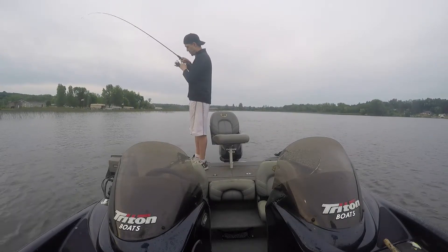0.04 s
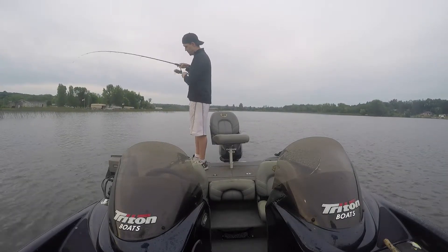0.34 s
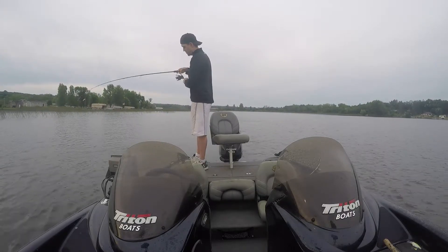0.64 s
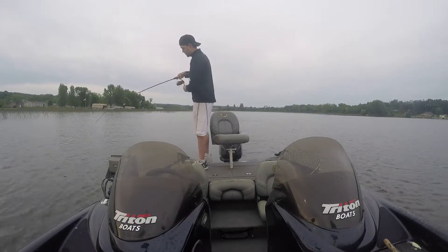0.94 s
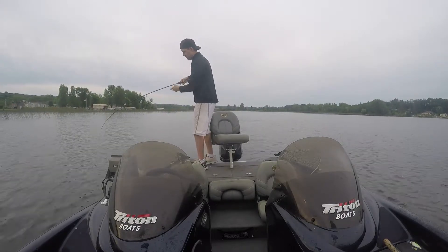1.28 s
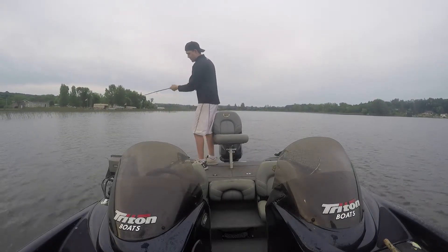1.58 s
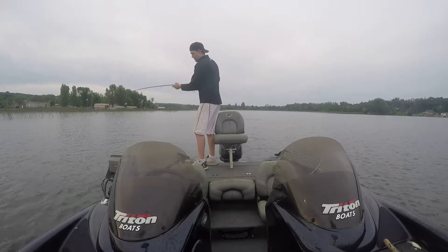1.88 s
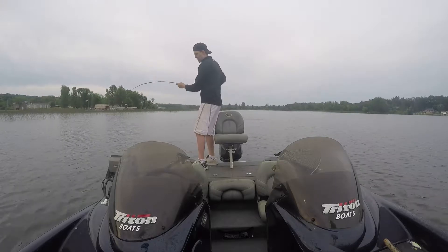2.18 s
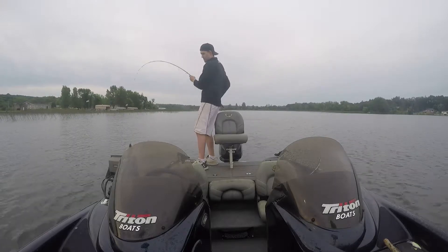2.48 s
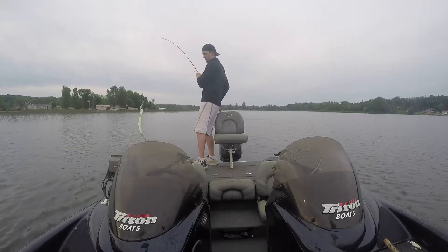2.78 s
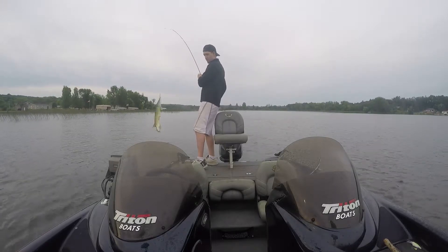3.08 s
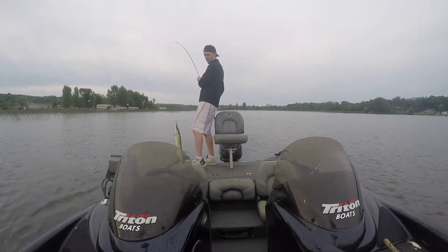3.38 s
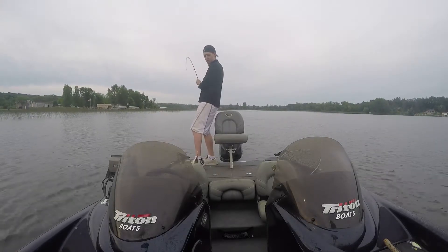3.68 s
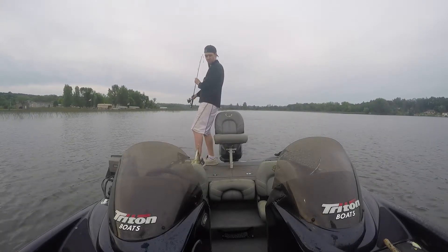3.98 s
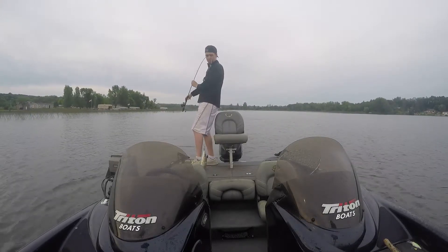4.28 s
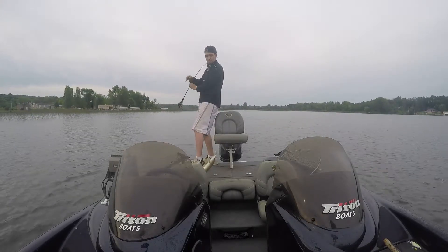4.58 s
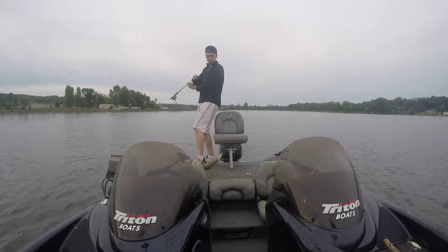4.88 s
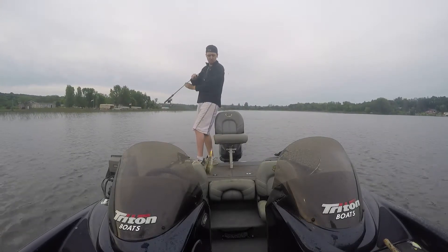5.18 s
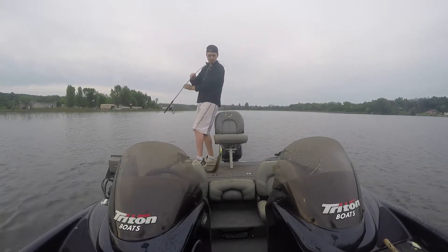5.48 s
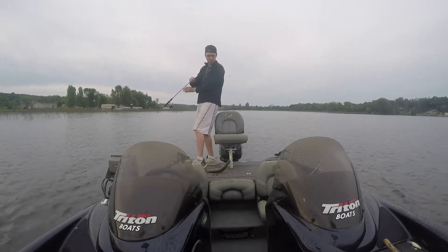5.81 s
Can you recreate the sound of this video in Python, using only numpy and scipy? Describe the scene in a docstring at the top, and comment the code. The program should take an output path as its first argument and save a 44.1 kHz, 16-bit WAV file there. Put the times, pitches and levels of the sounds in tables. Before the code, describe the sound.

Water laps and a fish thrashes briefly, followed by dull deck thumps, tackle clacks and rustling cloth, with low wind throughout.

```python
"""A fish thrashes at the surface of a lake as an angler lands it on a small boat.
Each stroke slaps the water, throws spray and traps air, which rings as bubbles; wavelets lap and gulp
at the hull. Blows excite the modes of the hollow deck, tackle clacks, soles scuff, and a jacket rustles
close by through stick-slip friction. Wind eddies rumble on the microphone over a soft open-air hiss,
and birds call faintly from the shore."""
import sys
import numpy as np
from scipy import signal
from scipy.fft import rfft, irfft, next_fast_len
from scipy.io import wavfile
from scipy.ndimage import uniform_filter1d, map_coordinates

SR = 44100
rng = np.random.default_rng(int(sys.argv[2]) if len(sys.argv) > 2 else 0)


def inscribe(sig):
    """Save sig as 16-bit PCM at rate SR to the path in sys.argv[1].

    A 1-D sig is mono; a 2-D sig holds one channel per row.
    Samples are clipped to [-1, 1] before scaling.
    """
    pcm = np.round(np.clip(np.atleast_2d(sig).T, -1, 1) * 32767)
    wavfile.write(sys.argv[1], SR, pcm.astype(np.int16))


N = 266805
SPLASH_RISE_S = 0.0012


def amp(db):
    """Decibels to amplitude gain."""
    return 10 ** (np.asarray(db) / 20)


def unit(x):
    """Scale to rms 1."""
    return x / np.sqrt(np.mean(x ** 2) + 1e-20)


def clock(seconds):
    """Sample times from zero."""
    return np.arange(int(seconds * SR)) / SR


def curve(rows):
    """Level per sample through (time [s], level [dB]) points, silent outside their span."""
    s, db = np.transpose(rows)
    return np.interp(np.arange(N) / SR, s, db, left=-120, right=-120)


def swell(s, hold, rise, t60):
    """Envelope that rises from time s, holds until s + hold and decays exponentially."""
    t = np.arange(N) / SR - s
    return np.clip(t / rise, 0, 1) * amp(-60 * np.maximum(t - hold, 0) / t60)


def wobble(rate):
    """Smooth random modulation with rate knots a second."""
    knots = rng.standard_normal(int(N * rate / SR) + 4)
    return map_coordinates(knots, [np.arange(N) * rate / SR])


def filtered(x, response):
    """Linear filter: the spectrum of x times a frequency response."""
    size = next_fast_len(len(x) + 8192)
    return irfft(rfft(x, size) * response(np.fft.rfftfreq(size, 1 / SR)), size)[:len(x)]


def coloured(x, response):
    """Linear filter scaled to conserve the power of white noise."""
    power = np.mean(np.abs(response(np.fft.rfftfreq(4096, 1 / SR))) ** 2)
    return filtered(x, response) / np.sqrt(power)


def spectrum(points):
    """Response through (frequency [Hz], level [dB]) points on a logarithmic frequency axis."""
    hz, db = np.transpose(points)
    return lambda f: amp(np.interp(np.log(f + 1), np.log(hz + 1), db))


def band(hz, width):
    """Response of two identical damped resonators in cascade, each width Hz wide."""
    return lambda f: (1j * f * width / (hz * hz - f * f + 1j * f * width)) ** 2


def dull(x, cutoff_hz=3900, order=7):
    """Low-pass filter that takes the top off an impact."""
    return filtered(x, lambda f: 1 / np.sqrt(1 + (f / cutoff_hz) ** (2 * order)))


def patchy(x, depth_db):
    """Random modulation in time and frequency, in patches of about 1 kHz by 15 ms."""
    bins = signal.stft(x, nperseg=256)[2]
    field = uniform_filter1d(rng.standard_normal(bins.shape), size=6, axis=0)
    field = uniform_filter1d(field, size=5, axis=1)
    return signal.istft(bins * unit(amp(depth_db * unit(field))), nperseg=256)[1][:N]


def add(track, s, sound):
    """Superpose a sound on the track at time s."""
    start = max(round(s * SR), 0)
    track[start:start + len(sound)] += sound[:max(N - start, 0)]


def ticks(rate, spread_db):
    """Shot noise: random impulses of uneven size, rate a second, rms 1."""
    impulses = (rng.random(N) < rate / SR) * rng.choice([-1, 1], N)
    return unit(impulses * amp(spread_db * rng.random(N)))


def puff(t, rise, t60):
    """Noise transient with a smooth onset and an exponential decay."""
    envelope = (1 - np.exp(-t / rise)) ** 2 * amp(-60 * t / t60)
    return 0.26 * rng.standard_normal(len(t)) * envelope / envelope.max()


def burst(hz, width, t60):
    """Impact: an impulse and decaying noise excite one broad resonance."""
    t = clock(.2)
    noise = rng.standard_normal(len(t)) * amp(-60 * t / t60) * (1 - np.exp(-t / 0.0015))
    push = filtered(signal.unit_impulse(len(t), round(.0012 * SR)), band(hz, width))
    return 0.53 * coloured(noise, band(hz, width)) + 0.5 * push / np.abs(push).max()


def boom(hz, cycles):
    """Heavily damped pressure pulse whose envelope peaks after the given cycles."""
    t = clock(.3)
    age = t * hz / cycles
    return (age * np.exp(1 - age)) ** 2 * np.sin(2 * np.pi * hz * t)


def damped_tone(t, hz, cycles, rise):
    """Damped oscillation whose pitch rises, as a bubble's does when it nears the surface."""
    age = t * hz / cycles
    phase = 2 * np.pi * cycles * (age + rise * (age - 1 + np.exp(-age)))
    return np.sin(phase) * np.exp(-age) * (1 - np.exp(-t * hz))


def cloud(count, low_hz, high_hz, cycles, spread_db):
    """Incoherent sum of bubbles of random onset, pitch and strength, rms 1."""
    t = clock(0.054)
    when, pitch, size = rng.random((count, 3)).T
    hz = low_hz * (high_hz / low_hz) ** pitch
    rings = (amp(spread_db * size ** 3) * hz)[:, None] * damped_tone(t, hz[:, None], cycles, rise=0.161)
    index = (when * N).astype(int)[:, None] + np.arange(len(t))
    return unit(np.bincount(index.ravel(), rings.ravel(), N)[:N])


def wind():
    """Turbulence: passing eddies press on the microphone in quick, low lumps."""
    # spectrum of the turbulence (frequency [Hz], level [dB])
    rumble = [(10, -17.5), (18, -6.5), (32, 0.5), (50, -5), (80, -14), (100, -20), (125, -15.5), (180, -27),
              (260, -30.5), (340, -40), (480, -62.5), (900, -70)]
    # strength of the wind (time [s], level [dB])
    strength = [(0, -38.5), (1.3, -38.5), (2.1, -37), (3.1, -39), (3.55, -34), (4.5, -36), (5.1, -33),
                (6.05, -38.5)]
    # single eddies striking (time [s], level [dB])
    buffets = [(0.302, -26), (0.574, -24.5), (0.718, -29), (1.875, -26.5), (2.142, -27), (3.325, -18),
               (4.241, -19), (4.894, -18.5), (5.594, -22.5), (5.654, -22)]
    eddies = coloured(rng.standard_normal(N), spectrum(rumble))
    level_db = np.interp(np.arange(N) / SR, *np.transpose(strength))
    out = unit(eddies * amp(0.65 * wobble(18))) * amp(level_db)
    for s, db in buffets:
        add(out, s, amp(db) * boom(hz=37.2, cycles=0.58))
    return out


def air():
    """Ambient noise: a nearly steady broadband hiss with a faint narrowband whine."""
    # spectrum of the open air (frequency [Hz], level [dB])
    ambience = [(100, 1.5), (400, 3), (800, -2), (1500, -9.5), (2300, -8.5), (3100, -7), (4200, -11.5),
                (6000, -14.5), (8000, -19.5), (11000, -21.5), (15500, -31)]
    hiss = unit(coloured(rng.standard_normal(N), spectrum(ambience))) * amp(.4 * wobble(5))
    whine = unit(filtered(rng.standard_normal(N), band(hz=8550, width=120)))
    return amp(-61) * hiss + amp(-88) * whine


def churn():
    """Bubble pitch falls with size: in stirred water big ones gurgle, small ones fizz, and drops patter."""
    # spectrum of stirred water (frequency [Hz], level [dB])
    water_colour = [(120, -40), (250, 8), (400, -13), (650, 5), (1100, 0), (1700, -5.5), (2200, -3),
                    (2550, -5.5), (3100, 0), (3700, -6.5), (4300, -12.5), (5700, -15), (6600, -36),
                    (11500, -26), (15500, -33)]
    # water heaved up by the fish (time [s], level [dB], t60 [s])
    heaves = [(.992, -43.5, 0.19), (1.042, -52, 0.28), (1.16, -43, 0.38), (1.325, -35, 0.12),
              (1.45, -41.5, 0.25)]
    # stirring around the boat (time [s], level [dB])
    stirring = [(0, -70.5), (.33, -65.5), (.7, -80), (.95, -62), (1.35, -56), (1.95, -64), (2.7, -86)]
    water = spectrum(water_colour)
    fizz = cloud(count=2800, low_hz=783, high_hz=4190, cycles=8.2, spread_db=12)
    fizz = unit(filtered(fizz, water))
    drops = coloured(ticks(rate=700, spread_db=16), water)
    foam = coloured(rng.standard_normal(N), water)
    patter = patchy(.52 * fizz + .5 * drops + .76 * foam, depth_db=1.5) * amp(1.2 * wobble(30))
    droplets = coloured(ticks(rate=1400, spread_db=18), band(hz=6000, width=7000))
    droplets = patchy(droplets, depth_db=3)
    drips = cloud(count=450, low_hz=850, high_hz=3400, cycles=4, spread_db=6)
    drips = unit(filtered(drips, lambda f: 1 / (1 + f / 700)))
    plops = cloud(count=900, low_hz=700, high_hz=2100, cycles=3.5, spread_db=8)
    plops = unit(filtered(plops, lambda f: 1 / (1 + f / 500)))
    gurgle = cloud(count=1100, low_hz=182, high_hz=857, cycles=2.7, spread_db=10)
    gurgle = unit(filtered(gurgle, lambda f: water(f) ** 0.37 / (1 + f / 300)))
    patch = amp(-49.5) * swell(1.241, hold=0.48, rise=0.24, t60=0.5)  # churned water foams and settles
    heave = sum(amp(db) * swell(s, hold=0.014, rise=0.014, t60=t60) for s, db, t60 in heaves)
    ripple = amp(curve(stirring))
    return (patter * np.hypot(patch, ripple) + (amp(-19.5) * droplets + amp(-5) * plops) * patch
            + amp(-2.5) * (drips * ripple + gurgle * heave))


def laps():
    """Liquid impact: a wavelet slaps the hull, then washes off more softly."""
    # wavelets (time [s], level [dB], centre frequency [Hz])
    wavelets = [(.172, -35.5, 1600), (0.236, -42, 1280), (.274, -52, 1700), (0.618, -39, 1380),
                (0.624, -26, 1490), (1.963, -45, 1470), (1.99, -37.5, 2550)]
    out = np.zeros(N)
    for s, db, hz in wavelets:
        slap = burst(hz, width=0.75 * hz, t60=0.016)
        wash = amp(-17) * burst(hz, width=hz, t60=0.082)
        add(out, s, amp(db - 1) * (slap + wash))
    return dull(out)


def hull_scatter(x):
    """Scattering: the boat's sides and the water add a short, weak tail to the direct sound."""
    t = clock(.08)
    tail = rng.standard_normal(len(t)) * amp(-60 * t / 0.059) * (t > .003)
    return x + amp(-10) * signal.fftconvolve(x, tail / np.linalg.norm(tail))[:N]


def bubbles():
    """Bubble resonance: a small splash traps air, which rings as a spring against the water's mass."""
    # single bubbles (time [s], level [dB], frequency [Hz])
    trapped_air = [(0.273, -36, 1740), (.304, -44, 1140), (0.447, -40.5, 1100), (0.872, -35.5, 970),
                   (.959, -39, 940), (.996, -33.5, 584), (0.994, -43, 268), (1.008, -38, 770),
                   (1.05, -39, 610), (1.072, -39, 537), (1.185, -38, 258), (1.198, -35, 1040),
                   (1.199, -36, 580), (1.307, -26, 1174), (1.3245, -32, 695), (1.344, -18.5, 782),
                   (1.446, -32, 1000), (1.495, -41, 910), (1.521, -26.5, 1025), (1.562, -32, 1250),
                   (1.647, -31, 980), (1.845, -40.5, 970), (2.04, -49, 1130), (2.13, -43, 866),
                   (2.142, -43, 1270), (2.16, -44, 820), (2.305, -35, 972), (2.435, -39.5, 1010),
                   (2.47, -44.5, 1600), (3.066, -39.5, 1070), (3.064, -45, 1620)]
    rings, splashes, t = np.zeros(N), np.zeros(N), clock(.1)
    for s, db, hz in trapped_air:
        add(rings, s, amp(db - 3.5) * damped_tone(t, hz, cycles=4.3, rise=0.01))
        splash = coloured(puff(t, SPLASH_RISE_S, t60=0.046), band(1.22 * hz, 0.67 * hz))
        add(splashes, s, amp(db - 12.5) * splash)
    return rings + dull(splashes)


def gulps():
    """Air-pocket resonance: air shut against the hull gurgles and sinks in pitch as water sloshes out."""
    # air pockets (time [s], level [dB], final frequency [Hz], initial excess of frequency [fraction])
    pockets = [(.628, -41.5, 494, 0.17), (3.943, -36.5, 473, 0.44), (4.533, -47.5, 578, 0.4),
               (5.346, -35.5, 506, 0.053)]
    out, t = np.zeros(N), clock(.15)
    envelope = (t / 0.012 * np.exp(1 - t / 0.0095)) ** 1.2
    for s, db, hz, excess in pockets:
        phase = 2 * np.pi * np.cumsum(hz * (1 + excess * np.exp(-t / 0.01))) / SR
        tremble = 1.14 * wobble(401)[:len(t)]  # the pocket's shape trembles
        flutter = amp(1.8 * wobble(310)[:len(t)])
        add(out, s, amp(db - 1) * envelope * flutter * np.sin(phase + tremble))
        slosh = coloured(puff(t, rise=0.0033, t60=0.074), band(1.4 * hz, 0.73 * hz))
        add(out, s, amp(db - 5) * slosh)
    return out


def thrashes():
    """Impact on a free surface: the fish smacks, slaps and throws spray; harder strokes last longer."""
    # strokes of the fish (time [s], level [dB], centre frequency [Hz], spray level [dB])
    strokes = [(0.994, -33, 650, -60), (1.021, -31, 2300, -43), (1.14, -37, 3000, -37.5),
               (1.164, -38, 1690, -60), (1.296, -20.5, 2310, -29.5), (1.304, -26.5, 2900, -39),
               (1.3235, -22, 3100, -28), (1.4434, -26.5, 1100, -58), (1.457, -21.5, 2300, -45),
               (1.463, -27.5, 700, -38)]
    # spectrum of fine spray (frequency [Hz], level [dB])
    spray_colour = [(800, -14), (2500, -6), (4500, -0.5), (5700, -1), (6800, -13), (10000, -12),
                    (15500, -15)]
    hard_db, hard_t60_s = -23.5, 0.045  # a hard stroke and its decay
    slaps, sprays, t = np.zeros(N), np.zeros(N), clock(.1)
    for s, db, hz, spray_db in strokes:
        slap = puff(t, SPLASH_RISE_S, t60=hard_t60_s * np.exp(.08 * (db - hard_db)))
        add(slaps, s, amp(db - 4) * coloured(slap, band(hz, 1.8 * hz)))
        add(slaps, s, amp(db - 3) * burst(hz, width=1.8 * hz, t60=0.0053))  # smack of first contact
        spray = coloured(puff(t, rise=0.0027, t60=0.025), spectrum(spray_colour))
        add(sprays, s, amp(spray_db - 7.5) * spray)
    return dull(slaps) + sprays


def plips():
    """Drop impact: each drop excites one short, bright, damped ring that bends upwards."""
    # drops on the surface (time [s], level [dB], starting frequency [Hz])
    drops = [(1.0015, -38, 900), (1.0216, -35, 1120), (1.022, -44, 2700), (1.046, -43, 2100),
             (1.088, -46, 3080), (1.111, -44, 1310), (1.136, -45, 1780), (1.157, -43, 1130),
             (1.1648, -40, 2380), (1.1655, -34, 757), (1.222, -48, 2870), (1.5123, -46, 1340),
             (1.5492, -40, 1210), (1.598, -43, 2330), (1.6507, -44, 2090), (1.7555, -44, 2380),
             (2.0363, -43, 2750)]
    rise_s, t60_s, glide = 0.00034, 0.0088, 0.049
    out, t = np.zeros(N), clock(.04)
    envelope = (1 - np.exp(-t / rise_s)) ** 2 * amp(-60 * t / t60_s)
    for s, db, hz in drops:
        phase = 2 * np.pi * np.cumsum(hz * (1 + glide * np.tanh(2 * t / t60_s))) / SR
        add(out, s, amp(db) * envelope / envelope.max() * np.sin(phase))
    return out


def rough_smack():
    """Superposed damped tones: a rough, buzzing smack of several pitches, cut off after about 30 ms."""
    # pitches of the smack (frequency [Hz], level [dB], decay time [cycles])
    pitches = [(520, -37, 11), (820, -37.5, 12), (1056, -33.5, 24), (1420, -39, 33), (3130, -41.5, 75),
               (3500, -50, 64), (3746, -45, 92)]
    start_s, length_s = 1.328, 0.033
    out, t = np.zeros(N), clock(.1)
    gate = 1 / (1 + (t / length_s) ** 16)
    for hz, db, cycles in pitches:
        add(out, start_s, amp(db) * damped_tone(t, hz, cycles, rise=0.0032) * gate)
    return out


def jacket():
    """Stick-slip friction of threads: a light touch ticks thinly, firm rubbing rasps, a fold snaps."""
    # strokes of the sleeve (time [s], duration [s], level [dB], relative sheen level [dB])
    rubs = [(2.13, .11, -58.5, -20), (3.04, 0.025, -59, -1), (3.14, 0.19, -64.5, -15),
            (3.46, 0.14, -58.5, -14), (3.614, 0.13, -54, -6), (3.747, 0.048, -70, -3),
            (3.873, 0.01, -55.5, -10), (3.933, 0.0083, -58.5, -19), (4.71, 0.035, -55.5, -19),
            (4.77, 0.1, -49.5, -11), (4.881, 0.071, -50, -18), (4.953, 0.095, -55, -16),
            (5.025, 0.085, -48.5, -10), (5.123, 0.2, -54.5, -20), (5.332, 0.26, -61.5, -24)]
    # folds slipping (time [s], level [dB], t60 [s], tilt [dB/octave])
    folds = [(2.139, -41, 0.12, -3), (2.165, -46, .09, 0), (2.203, -38, .04, 0), (3.188, -40, 0.022, 1),
             (3.549, -37, 0.035, 8), (3.580, -35.5, 0.019, 4), (3.594, -40, 0.035, -1),
             (3.617, -33.5, 0.044, -2.5), (3.638, -27.5, 0.022, 1), (3.644, -35.5, 0.067, -3),
             (3.6757, -20, 0.016, 6), (3.679, -34.5, 0.072, 5), (3.727, -36, .03, 9),
             (4.768, -25.5, 0.031, 3), (4.798, -25, 0.049, 9), (4.823, -23, 0.055, 0.5),
             (4.8956, -25, 0.025, -3.5), (4.901, -27, 0.026, 2), (4.915, -28, 0.049, 10),
             (4.929, -22, 0.035, -2.5), (4.995, -32, 0.055, 6), (5.032, -24.5, 0.061, 3.5),
             (5.069, -24, 0.033, 5), (5.080, -27, 0.031, 7), (5.091, -25.5, 0.044, 12),
             (5.182, -34, 0.046, 3), (5.206, -33.5, 0.063, 8), (5.239, -35.5, 0.089, 4),
             (5.275, -34, .02, 6), (5.298, -32, 0.04, 1)]
    # single threads letting go (time [s], level [dB])
    releases = [(3.006, -44), (3.052, -43), (3.061, -43), (3.150, -50), (3.280, -46), (3.315, -47),
                (3.508, -49), (3.810, -46), (3.880, -57), (5.334, -49), (5.362, -46), (5.43, -50),
                (5.497, -44), (5.737, -45.5)]
    # spectrum of the cloth (frequency [Hz], level [dB])
    cloth_colour = [(300, 0.5), (1000, -7), (2200, -6), (3300, 3.5), (3800, -3.5), (4300, -15),
                    (5400, -9.5), (6600, -6), (7400, 9), (8200, -9.5), (9600, 0.5), (11000, -11.5),
                    (13000, -3), (15500, -14)]
    cloth = spectrum(cloth_colour)
    snaps, singles, t = np.zeros(N), np.zeros(N), clock(.1)
    jerks = unit(amp(2.8 * np.tanh(wobble(70)) + 3 * np.tanh(wobble(260))))
    strokes = np.array([amp(db) * swell(s, hold, rise=0.006, t60=0.22) for s, hold, db, _ in rubs])
    rub = strokes.sum(0) * jerks
    for s, db, t60, tilt_db in folds:
        tilted = lambda f: cloth(f) * amp(tilt_db * np.log2(1 + f / 1000))
        add(snaps, s, amp(db - 3) * coloured(puff(t, rise=0.014 * t60, t60=t60), tilted))
    for s, db in releases:
        add(singles, s, amp(db - 2) * puff(t, rise=0.0004, t60=0.018))
    pressure = 1 / (1 + (amp(-55) / rub) ** 2)  # 0 for a light touch, 1 for a firm one
    catches = rub * (1 - .6 * pressure) * (ticks(rate=240, spread_db=16) + .25 * rng.standard_normal(N))
    rasp = rub * pressure * (.8 * ticks(rate=1900, spread_db=24) + .58 * rng.standard_normal(N))
    thread_peaks = lambda f: band(7390, 490)(f) + .27 * band(12200, 1500)(f) + .13 * band(15000, 900)(f)
    thin = coloured(0.3 * catches + singles, thread_peaks)
    sheen_gain = amp(np.array(rubs)[:, 3]) @ strokes
    sheen = coloured(sheen_gain * ticks(rate=440, spread_db=14), band(hz=14700, width=1500))
    return patchy(thin + sheen + snaps + coloured(rasp, cloth), depth_db=3)


def zing():
    """Stick-slip excitation: quick, light slips run together in one narrow, high resonance."""
    # slipping while the fish is lifted (time [s], level [dB])
    slipping = [(2.9, -80), (2.92, -68), (3.0, -70.5), (3.06, -65), (3.12, -74), (3.15, -82)]
    slips_per_s = 70
    slip_count = np.cumsum(slips_per_s * (1 + .25 * wobble(40))) / SR
    pulses = .1 + np.exp(-6 * (slip_count % 1))
    slips = unit(rng.standard_normal(N) * pulses * amp(4 * wobble(60)))
    return amp(curve(slipping)) * coloured(slips, band(hz=7500, width=520))


def deck_thumps():
    """Modal vibration: soft, heavy blows flex the deck, ring its panels and set the air below booming."""
    # blows (time [s], level [dB], boom [Hz], ring level [dB], knock level [dB], knock [Hz])
    blows = [(3.464, -26, 103, -55, -44, 327), (3.593, -15.5, 63, -38, -26.5, 298),
             (3.625, -18, 87.5, -43.5, -49, 250), (4.76, -16.5, 78, -42, -41, 260),
             (5.062, -22, 85.5, -60, -47, 300), (5.068, -21.5, 165, -31.5, -19, 370),
             (5.084, -28, 168, -38.5, -26, 400), (5.1205, -9.5, 70.4, -32, -28, 310),
             (5.142, -9.5, 70, -43, -37, 340), (5.292, -20.5, 54.5, -43, -40, 387),
             (5.531, -25, 106, -49, -47, 390)]
    # panel modes (frequency [Hz], level [dB], t60 [s])
    modes = [(119, -6.5, 0.36), (139, 1, 0.3), (168.3, 5.5, 0.2), (203, 6, 0.074), (232, 7.5, 0.065),
             (287, 2, 0.091), (320, -1, 0.11), (400, -4.5, 0.12), (454, -11, 0.15), (532, -7, 0.099)]
    hollow_hz, hollow_t60_s, knock_cycles = 75.6, 0.6, 2.8
    out, t = np.zeros(N), clock(0.42)
    hollow = np.sin(2 * np.pi * hollow_hz * t) * amp(-60 * t / hollow_t60_s)
    hollow *= 1 - np.exp(-t * hollow_hz)
    for s, db, boom_hz, ring_db, knock_db, knock_hz in blows:
        add(out, s, amp(db - 1.5) * boom(boom_hz, cycles=0.67))
        add(out, s, amp(db - 16) * hollow)
        ring = np.zeros(len(t))
        for hz, mode_db, t60 in modes:
            decay = amp(mode_db + rng.normal(0, 1.5) - 60 * t / t60)
            ring += decay * np.sin(2 * np.pi * (hz * t + rng.random()))
        add(out, s, amp(ring_db - 1) * ring * (1 - np.exp(-t / 0.0045)))
        knock = np.sin(2 * np.pi * knock_hz * t) * np.exp(-t * knock_hz / knock_cycles)
        add(out, s, amp(knock_db - 9.5) * knock)
        add(out, s, amp(knock_db - 10.5) * burst(hz=370, width=300, t60=0.07))
    return out


def deck_clacks():
    """Hard impact: a brief contact with the deck excites a broad band and leaves a faint tail."""
    # contacts (time [s], level [dB], centre frequency [Hz])
    contacts = [(3.597, -41, 700), (4.745, -34, 800), (4.893, -33, 2380), (4.93, -39, 1300),
                (5.0689, -17.5, 900), (5.0701, -28, 3000), (5.119, -34, 1200), (5.301, -30, 700),
                (5.303, -30, 2470)]
    out = np.zeros(N)
    for s, db, hz in contacts:
        add(out, s, amp(db - 3) * burst(hz, width=1300, t60=0.022))
        add(out, s, amp(db - 24) * burst(hz, width=2900, t60=0.056))
    return dull(out, cutoff_hz=3950, order=8)


def birds():
    """Frequency-modulated tones: falling notes and level whistles waver on their way from the shore."""
    # slurred notes (time [s], duration [s], starting frequency [Hz], level [dB])
    slurs = [(4.175, .03, 4850, -71), (4.225, .035, 4700, -67), (4.252, .026, 4850, -66),
             (5.595, .045, 4900, -71), (5.697, .038, 3880, -60)]
    # thin whistles (time [s], duration [s], frequency [Hz], level [dB])
    whistles = [(5.68, .1, 2490, -67), (5.85, .19, 2525, -66)]
    out = np.zeros(N)
    for notes, fall_hz_per_s in (slurs, 17000), (whistles, 0):
        for s, length, start_hz, db in notes:
            t = clock(length)
            hz = (start_hz - fall_hz_per_s * t) * (1 + 0.015 * wobble(426)[:len(t)])
            envelope = amp(db) * np.sin(np.pi * t / length)
            add(out, s, envelope * np.sin(2 * np.pi * np.cumsum(hz) / SR))
    return out


def scuffs():
    """Sliding friction: soles drag over the deck in short puffs of high noise."""
    # drags of a sole (time [s], level [dB])
    drags = [(4.886, -40), (4.895, -39), (4.925, -47), (5.031, -43)]
    out, t = np.zeros(N), clock(.08)
    for s, db in drags:
        add(out, s, amp(db) * coloured(puff(t, rise=.002, t60=0.03), band(hz=5900, width=2100)))
    return out


def tackle():
    """Rebound: hard tackle chatters on the boat, each contact cracking and ringing its damped modes."""
    # contacts (time [s], level [dB])
    contacts = [(5.306, 0), (5.30822, -4), (5.3118, -15)]
    # modes of the tackle (frequency [Hz], level [dB], t60 [s])
    modes = [(620, -39, .03), (1080, -41, 0.033), (1880, -43, .012), (2750, -28, 0.0072),
             (3140, -17, 0.0057), (4700, -40, 0.0045), (6400, -38, 0.0085)]
    crack_db, crack_t60_s = -30, 0.0033
    out, t = np.zeros(N), clock(.06)
    ring = sum(amp(db - 60 * t / t60) * np.sin(2 * np.pi * hz * t) for hz, db, t60 in modes)
    ring *= 1 - np.exp(-t / .0002)
    for s, db in contacts:
        crack = amp(crack_db + db - 60 * t / crack_t60_s) * rng.standard_normal(len(t))
        add(out, s, amp(db) * (ring + crack))
    return out


def scene():
    """Superposition of all sources as heard from the boat, in one channel."""
    surroundings = wind() + air() + birds() + churn()
    splashes = laps() + thrashes() + bubbles() + rough_smack() + plips() + gulps()
    near_hull = hull_scatter(splashes + tackle())
    aboard = deck_thumps() + deck_clacks() + scuffs() + jacket() + zing()
    return (surroundings + near_hull + aboard)[None]


def record(dry):
    """Band-limited output in which the treble dips briefly now and then."""
    # dips of the treble (time [s], gain [dB])
    dips = [(1.425, -8.5), (1.62, -5.5), (1.877, -16.5), (2.685, -12), (3.389, -8), (3.774, -7),
            (4.541, -7.5), (5.757, -8)]
    crossover_hz, top_hz, dip_half_width_s = 700, 15600, 0.0079
    t = np.arange(N) / SR
    low = filtered(dry[0], lambda f: 1 / (1 + (f / crossover_hz) ** 4))
    treble = dry[0] - low
    dip_db = sum(db * np.exp(-((t - s) / dip_half_width_s) ** 4) for s, db in dips)
    return filtered(low + treble * amp(dip_db), lambda f: f < top_hz)[None]


dry = scene()
out = record(dry)
inscribe(out)
```